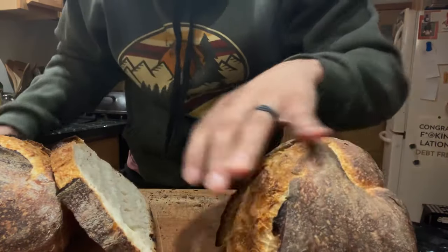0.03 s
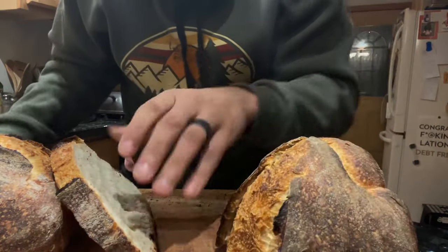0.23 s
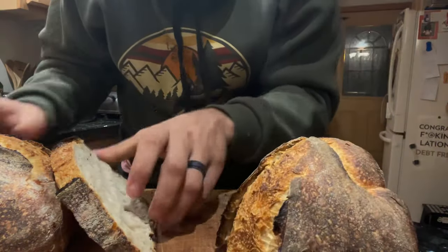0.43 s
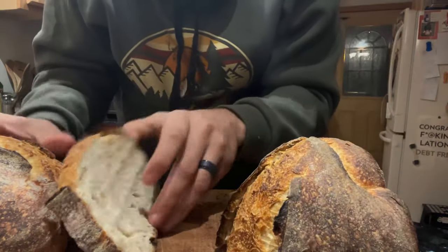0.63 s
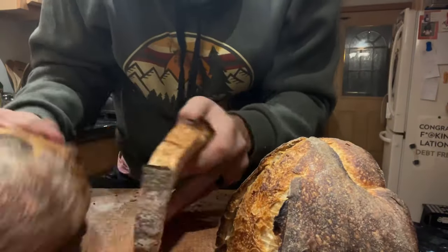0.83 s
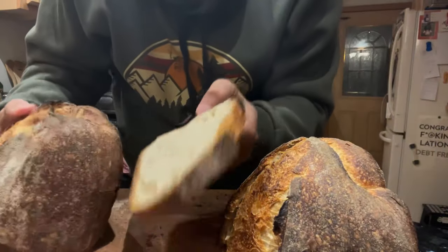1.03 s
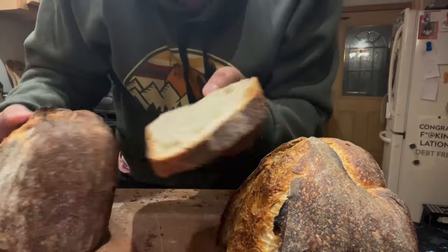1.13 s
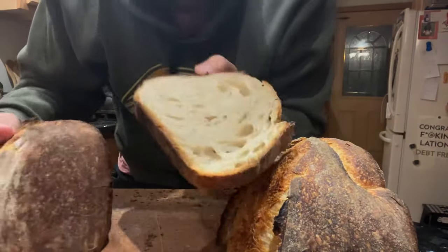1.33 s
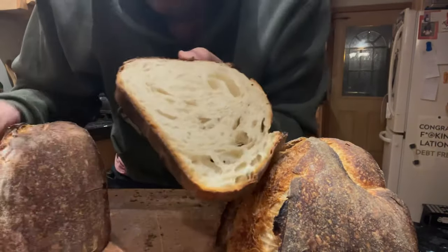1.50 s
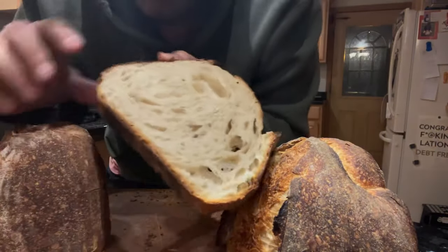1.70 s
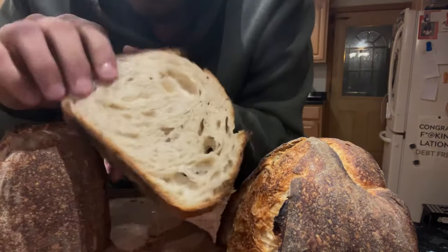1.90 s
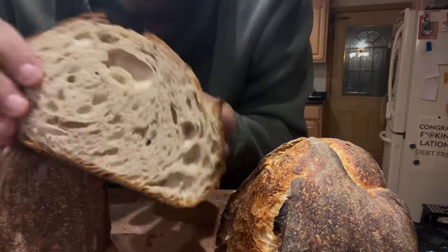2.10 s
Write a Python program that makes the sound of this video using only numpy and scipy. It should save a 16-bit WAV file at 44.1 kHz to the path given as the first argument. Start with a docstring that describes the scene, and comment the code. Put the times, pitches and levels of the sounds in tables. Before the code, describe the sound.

A knife knocks onto a wooden board, then crusty bread scrapes and crackles.

```python
"""A quiet kitchen hums and echoes around a close pair of microphones. First a hard object, a bread knife,
is put down on a wooden board: a touch, a loud knock and a few bounces, one with a sharp crack, excite the
modes of board and blade. Then a hand pulls a slice from a crusty loaf: the crust scrapes by stick-slip
friction and its brittle flakes crackle and snap. After about a second the loaf settles with soft thuds,
and the scraping dies away."""
import sys
import numpy as np
from scipy import signal
from scipy.fft import rfft, irfft
from scipy.io import wavfile

SR = 44100
rng = np.random.default_rng(int(sys.argv[2]) if len(sys.argv) > 2 else 0)


def dump_mix(stems):
    """Bounce the given channels to the path in sys.argv[1] as a 16-bit WAV at rate SR."""
    frames = np.atleast_2d(stems).T  # one column per channel
    limited = np.clip(frames, -1, 1)  # hard clip at full scale
    pcm = np.round(limited * 32767).astype(np.int16)
    wavfile.write(sys.argv[1], SR, pcm)


N = 94815


def amp(db):
    """The decibel scale: 20 dB is a factor of ten in amplitude."""
    return 10 ** (np.asarray(db) / 20)


def unit(x):
    """Normalisation to an rms of 1."""
    return x / np.sqrt(np.mean(x ** 2) + 1e-20)


def read(points, hz):
    """Interpolation on a logarithmic frequency axis."""
    f, value = np.transpose(points)
    return np.interp(np.log(hz + 1), np.log(f + 1), value)


def add(mix, start_s, sound):
    """Superposition: a sound sums into the mix from start_s on."""
    part = mix[..., max(round(start_s * SR), 0):][..., :sound.shape[-1]]
    part += sound[..., :part.shape[-1]]


def colour(x, spectrum, keep_power=True, size=4096):
    """Minimum-phase filtering: the phase follows from the log magnitude by a Hilbert transform."""
    gain = amp(read(spectrum, abs(np.fft.fftfreq(size, 1 / SR))))
    gain = unit(gain) if keep_power else gain
    response = np.exp(np.conj(signal.hilbert(np.log(gain))))
    taps = np.fft.ifft(response).real[:size // 2]
    return signal.fftconvolve(x, taps[None], axes=1)[:, :x.shape[1]]


def place(pair, lead_s, coherence):
    """Time-difference stereo: the right channel shares part of the left and arrives later."""
    right = coherence * pair[0] + np.sqrt(1 - coherence ** 2) * pair[1]
    return np.array([pair[0], np.roll(right, round(lead_s * SR))])


def ring(modes, t, rise_cycles=1):
    """Modal vibration: a sum of damped sines, each building up over rise_cycles of its own period."""
    return sum(np.minimum(t * hz / rise_cycles, 1) * amp(db - 60 * t / t60) * np.sin(2 * np.pi * hz * t)
               for hz, db, t60 in modes)


# spectrum of the hum: frequency_hz, relative_db
HUM_SPECTRUM = [(25, -36), (50, 3), (65, -5), (170, -7), (215, -3.5), (290, -1), (350, -15), (500, -14.5),
                (700, -23), (2800, -47.5), (8000, -53.5)]
# likeness of the hum at left and right: frequency_hz, coherence
HUM_COHERENCE = [(60, 0.66), (150, 1), (300, .4), (1000, 0.061)]

def hum():
    """Steady room noise, most coherent between the channels at long wavelengths."""
    hz = np.fft.rfftfreq(N, 1 / SR)
    left, independent = rfft(rng.standard_normal((2, N)))
    coherence = np.clip(read(HUM_COHERENCE, hz), 0, 1)
    right = coherence * left + np.sqrt(1 - coherence ** 2) * independent
    spectra = np.array([left, right]) * amp(read(HUM_SPECTRUM, hz))
    return amp(-49.5) * unit(irfft(spectra, N))


# reverberation time of the kitchen: frequency_hz, t60_s
ROOM_DECAY = [(100, 0.17), (500, 0.61), (1500, 0.37), (6000, 0.38), (15000, 0.29)]

def kitchen(x, wet_db, mono_below_hz=SR / 200, build_s=0.001):
    """Reverberation: dense reflections follow the direct sound, each band decaying at its own rate."""
    hz, t, bands = signal.stft(rng.standard_normal((2, SR // 2)), SR, nperseg=256)
    bands[1] = np.where(hz[:, None] < mono_below_hz, bands[0], bands[1])
    decay = amp(-60 * t / read(ROOM_DECAY, hz)[:, None])
    tail = signal.istft(bands * decay, SR, nperseg=256)[1]
    tail *= np.minimum(np.arange(tail.shape[1]) / SR / build_s, 1) ** 2
    return x + amp(wet_db) * signal.fftconvolve(x, tail / np.linalg.norm(tail[0]), axes=1)[:, :N]


# soft impacts of loaf and hand: start_s, level_db
LOAF_IMPACTS = [(1.04, -51), (1.099, -43.5), (1.363, -42), (1.399, -30.5)]
# modes of the loaf on the board: pitch_hz, relative_db, t60_s
LOAF_MODES = [(77.8, -5.5, 0.37), (114, 9, 0.047), (142, -3.5, 0.17), (210, -7, 0.12)]

def thuds():
    """Soft impact: the loaf rocking on the board excites only low modes."""
    t, out = np.arange(SR // 2) / SR, np.zeros((2, N))
    for start_s, db in LOAF_IMPACTS:
        add(out, start_s, amp(db) * ring(LOAF_MODES, t, rise_cycles=0.31))
    return kitchen(out, wet_db=-11.5)


# strokes on crust and wood, rise and fall timed over 20 dB: peak_s, rise_s, fall_s, rasp_db, grit_db
STROKES = [(.01, 0.071, 0.15, -58.5, -56), (0.2121, 0.0098, 0.0038, -34.5, -31.5),
           (.543, 0.023, 0.049, -43, -39.5), (0.664, 0.039, 0.11, -45, -48.5),
           (0.712, 0.027, 0.0051, -48, -44.5), (.793, 0.037, 0.059, -42.5, -37.5),
           (0.836, 0.064, 0.19, -42.5, -52), (0.879, 0.044, 0.064, -44.5, -37.5),
           (0.912, 0.061, 0.049, -35, -38), (1.014, 0.021, 0.044, -39, -43),
           (1.037, 0.0056, 0.02, -36.5, -61), (1.149, 0.014, 0.094, -44, -50.5),
           (1.188, 0.15, 0.13, -56, -50.5), (1.28, 0.032, 0.022, -47, -64), (1.348, 0.055, 0.024, -48, -49),
           (1.386, 0.051, 0.065, -45, -53), (1.884, 0.066, 0.039, -59, -74),
           (1.941, 0.024, 0.03, -58.5, -56), (2.049, 0.1, 0.1, -70, -69.5)]
# spectra of the dull rasp and the bright grit: frequency_hz, relative_db
RASP_SPECTRUM = [(100, -31), (300, -8), (600, 6.5), (1000, 2.5), (1750, 2), (2500, -5), (4000, -27.5),
                 (9000, -55.5)]
GRIT_SPECTRUM = [(700, 8), (2000, -5), (3700, 8), (5500, 0), (8000, -2), (10000, -0.5), (13800, -10.5),
                 (16000, -13.5)]

def rubs(slips_per_s=9000, slip_spread_db=3, clump_s=0.006, clump_db=2.2):
    """Stick-slip friction: rubbing surfaces catch and release in clumps of tiny impulses."""
    t, power = np.arange(N) / SR, np.zeros((2, N))
    for peak_s, rise_s, fall_s, rasp_db, grit_db in STROKES:
        drop_db = 20 * np.maximum((peak_s - t) / rise_s, (t - peak_s) / fall_s)
        power += amp(np.array([[rasp_db], [grit_db]]) - drop_db) ** 2
    knots = np.arange(0, N / SR, clump_s)
    out = np.zeros((2, N))
    for envelope, spectrum in zip(np.sqrt(power), (RASP_SPECTRUM, GRIT_SPECTRUM)):
        clumps = amp(clump_db * np.interp(t, knots, rng.standard_normal(len(knots))))
        slips = rng.random(N) < slips_per_s / SR
        sizes = amp(slip_spread_db * np.minimum(rng.exponential(1, N), 4))
        friction = unit(clumps * slips * sizes * rng.choice([-1, 1], (2, N)))
        out += colour(envelope * friction, spectrum)
    return out


# sharp cracks, the knife's rebound on the board and then flakes of crust snapping:
# start_s, level_db, pitch_hz, decay_s
CRACKS = [(0.3332, -24, 4500, 0.0034), (.525, -41.5, 4850, 0.0062), (.657, -29.5, 623, 0.0014),
          (0.678, -35, 6300, 0.0016), (.7385, -31, 5970, 0.00068), (0.7928, -37, 4560, 0.00058),
          (0.924, -32, 7250, 0.0011), (0.959, -34, 2840, 0.0019), (.987, -39, 4960, 0.0035),
          (0.9932, -25, 3080, 0.0018), (1.0465, -27, 3860, 0.00059), (1.086, -42.5, 7200, 0.00047),
          (1.146, -40, 1980, 0.0085), (1.228, -37, 1330, 0.0017), (1.2688, -25, 7400, 0.00024),
          (1.2791, -30, 8400, 0.0015), (1.3711, -33, 4940, 0.0023), (1.373, -37, 1100, 0.0079),
          (1.396, -36, 7800, 0.0011), (1.441, -47, 3060, 0.0034), (1.611, -60.5, 4970, .0013),
          (1.7027, -51.5, 1250, 0.0025), (1.7066, -43.5, 5400, .001), (1.949, -47.5, 7700, 0.0025)]

def cracks(flank_db_per_octave=10):
    """Impulsive transients: the rebounding knife, then each snapping flake, makes a brief noise burst."""
    t, out = np.arange(SR // 30) / SR, np.zeros((2, N))
    for start_s, db, hz, decay_s in CRACKS:
        peak = [(hz * 2. ** octave, -flank_db_per_octave * abs(octave)) for octave in (-10, 0, 10)]
        burst = amp(db) * np.exp(-t / decay_s) * rng.choice([-1, 1], (2, len(t)))
        add(out, start_s, colour(burst, peak))
    return out


# blows of the knife on the board: start_s, push_db, body_db, clack_db, board_db, cutoff_hz
BLOWS = [(0.046, -58, -40, -30, -21, 572), (0.2111, -24, -17.5, -18, -8.5, 2500),
         (0.2681, -29, -27.5, -17.5, -64, 665), (0.318, -35.5, -44, -67, -23, 1500),
         (0.3321, -31, -39, -33, -24.5, 830), (0.366, -44, -43, -34, -25.5, 600),
         (0.413, -37, -42, -39, -41, 590)]
# spectra of a blow's low push, woody body and sharp clack: frequency_hz, relative_db
PUSH_SPECTRUM = [(30, -30), (65, -9.5), (100, 0), (270, -6.5), (400, -13.5), (900, -40.5)]
BODY_SPECTRUM = [(200, -58), (500, 9), (850, 2), (1400, 4.5), (2200, -1.5), (4000, -7), (12000, -30)]
CLACK_SPECTRUM = [(800, -37), (2500, -13), (4600, -4), (6500, 1), (8200, -4.5), (10000, -6.5), (14000, -4),
                  (16000, -12.5)]
# modes of the board: pitch_hz, relative_db, t60_s
BOARD_MODES = [(103.1, -22, 0.34), (144, -24, 0.33), (225.1, -23.5, 0.33), (346, -24.5, 0.59),
               (476, -17.5, 0.37), (563.1, -10, 0.17), (662.5, -16, 0.22), (838.5, 0, 0.115),
               (1369, -1, 0.074), (1793, -8, 0.11)]
# modes of the blade, with levels relative to the clack: pitch_hz, relative_db
BLADE_MODES = [(1902, -27.5), (2320, -19), (3235, -14.5), (3447, -20.5), (3790, -21.5), (6100, -33),
               (7050, -13), (8050, -21), (14570, -25)]

def knocks(contact_s=0.0015, rise_s=0.000077, swell_s=0.009, blade_t60_s=0.055, lead_s=0.00027):
    """Impact excitation: each blow makes three bands of noise and sets board and blade ringing freely."""
    t = np.arange(SR // 2) / SR
    bursts, board, blade = np.zeros((3, 2, N)), np.zeros(N), np.zeros((2, N))
    rise, swell = np.minimum(t / rise_s, 1), np.minimum(t / swell_s, 1)
    attacks, t60s_s = (swell, rise, rise), (0.21, 0.16, 0.023)  # push, body, clack
    released_s = np.maximum(t - contact_s, 0)
    for start_s, push_db, body_db, clack_db, board_db, cutoff_hz in BLOWS:
        for band, attack, db, t60 in zip(bursts, attacks, (push_db, body_db, clack_db), t60s_s):
            envelope = attack * amp(db - 60 * released_s / t60)
            add(band, start_s, envelope * rng.choice([-1, 1], (2, len(t))))
        # a soft blow has a low cutoff and reaches only the low modes
        excited = [(hz, db - 20 * np.log10(1 + (hz / cutoff_hz) ** 8), t60)
                   for hz, db, t60 in BOARD_MODES]
        add(board, start_s, amp(board_db) * ring(excited, t))
        steel = sum(amp(db) * np.sin(2 * np.pi * (hz * t + rng.random((2, 1)))) for hz, db in BLADE_MODES)
        add(blade, start_s, rise * amp(clack_db - 60 * t / blade_t60_s) * steel)
    push, body, clack = map(colour, bursts, (PUSH_SPECTRUM, BODY_SPECTRUM, CLACK_SPECTRUM))
    blows = kitchen(place(body, lead_s, coherence=0.36) + place(push, lead_s, coherence=1), wet_db=-8)
    blows += kitchen(place(clack, lead_s, coherence=0.36), wet_db=-9)
    wood = place([board, board], lead_s=0.00032, coherence=1) * amp([[2], [-2]])  # louder on the left
    # close resonances of the struck things ripple the spectrum above the blade's lowest mode
    ripple_db, step_hz = 4, 130
    ripple = [(hz, ripple_db * np.clip(rng.standard_normal(), -2, 2) * (hz > BLADE_MODES[0][0]))
              for hz in np.arange(0, SR / 2, step_hz)]
    return colour(blows, ripple, keep_power=False) + kitchen(blade, wet_db=-9) + kitchen(wood, wet_db=-18)


def scene():
    """Superposition of knife, crust, loaf and hum in the kitchen."""
    knife = knocks()
    lead_s = 0.00013
    crackle = place(rubs(), lead_s, coherence=0.6) + place(cracks(), lead_s, coherence=0.36)
    return knife + kitchen(crackle, wet_db=-14.5) + thuds() + hum()


# frequency response of the microphones: frequency_hz, gain_db
MIC_RESPONSE = [(20, -27.5), (40, -13), (62, 0.5), (9400, 0), (11100, -15), (12700, 1)]

def record(dry, band_edge_hz=16100):
    """Linear filtering: the microphones colour the sound and a steep low-pass limits its bandwidth."""
    heard = colour(dry, MIC_RESPONSE, keep_power=False)
    low_pass = signal.firwin(255, band_edge_hz, window=("kaiser", 9), fs=SR)
    return signal.oaconvolve(heard, low_pass[None], "same")


dry = scene()
out = record(dry)
dump_mix(out)
```